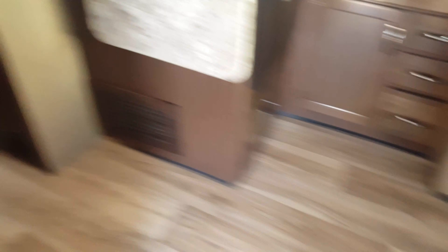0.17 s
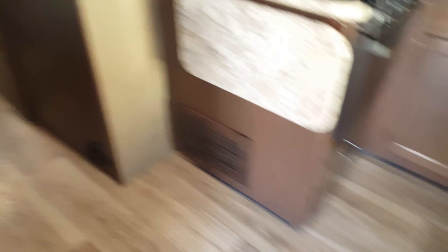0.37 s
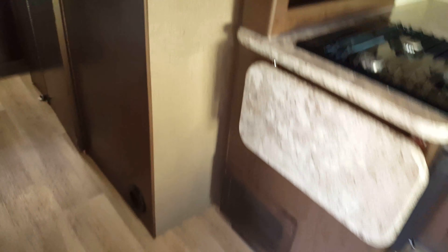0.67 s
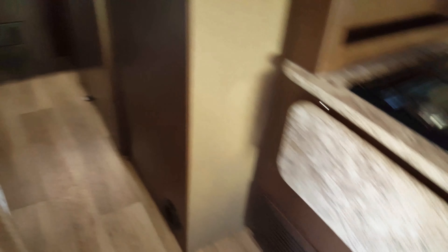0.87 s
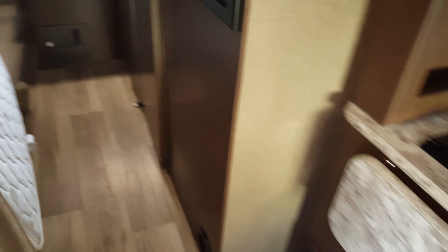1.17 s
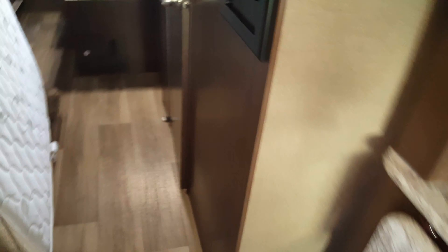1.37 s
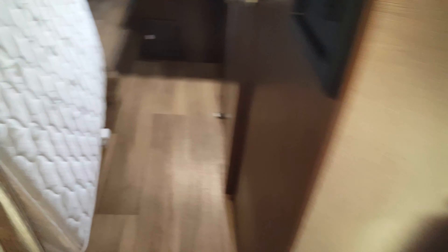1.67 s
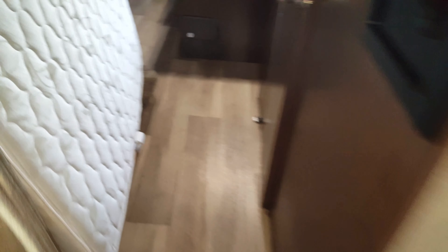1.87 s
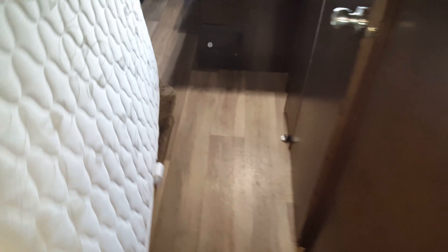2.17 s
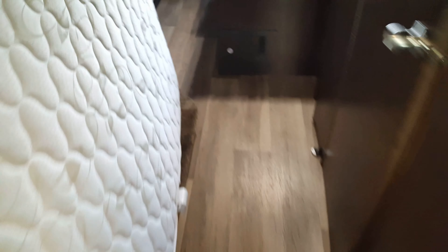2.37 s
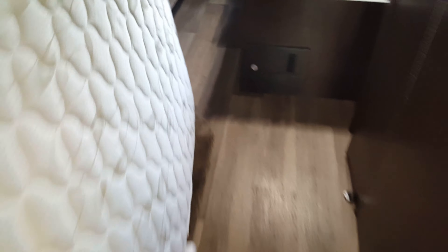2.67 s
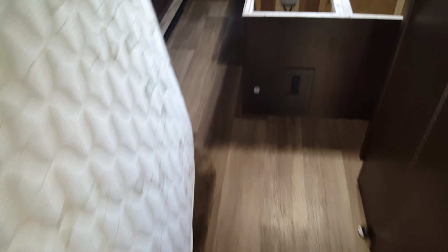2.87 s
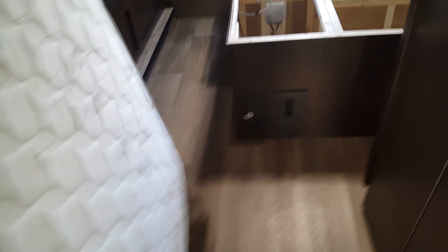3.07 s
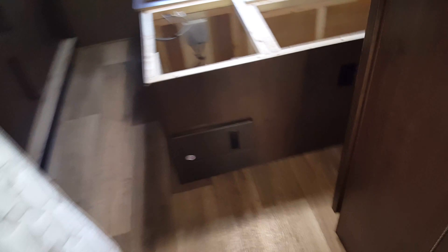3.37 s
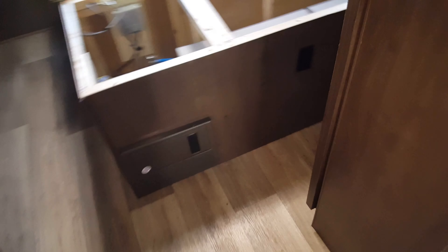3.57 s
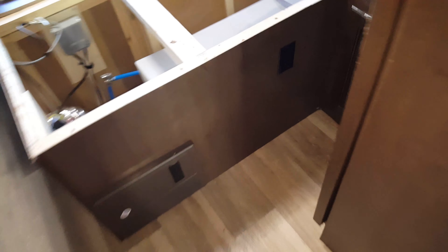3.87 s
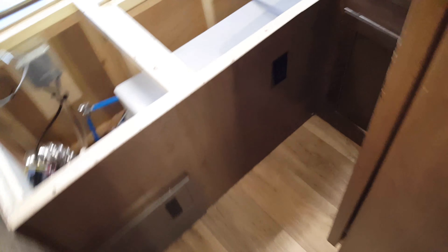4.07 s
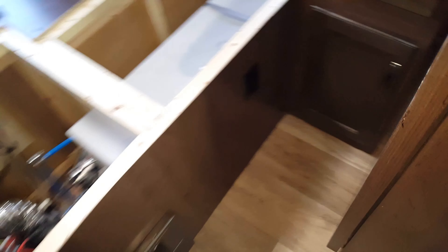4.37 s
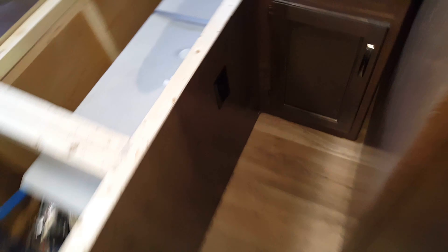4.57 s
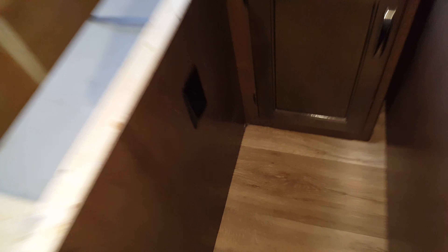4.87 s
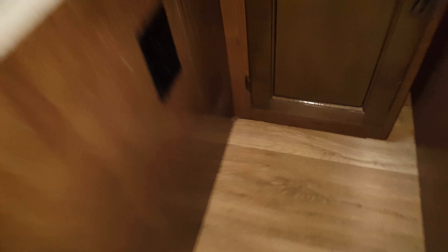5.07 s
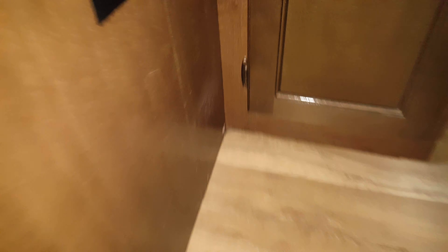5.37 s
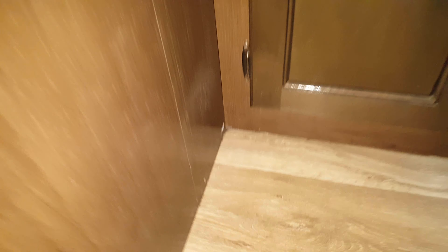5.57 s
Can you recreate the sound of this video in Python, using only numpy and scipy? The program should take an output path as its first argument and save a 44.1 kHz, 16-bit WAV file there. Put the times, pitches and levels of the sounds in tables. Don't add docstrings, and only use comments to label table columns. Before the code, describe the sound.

Someone walks through a small vehicle interior with faintly chiming keys; two heavy footfalls, a bright metallic clatter against a panel, then quieter thuds and rustling.

```python
import sys
import numpy as np
from scipy import signal
from scipy.fft import rfft, irfft
from scipy.io import wavfile
from scipy.ndimage import uniform_filter1d, minimum_filter1d

SR = 44100
rng = np.random.default_rng(int(sys.argv[2]) if len(sys.argv) > 2 else 0)


def unload_wav(signal):
    wavfile.write(
        sys.argv[1],
        SR,
        np.round(np.clip(np.atleast_2d(signal).T, -1, 1) * 32767).astype(np.int16),
    )


def attenuation_scalar(level_db):
    decades = np.asarray(level_db, float) / 20
    return 10 ** decades


N = 252252

# (time [s], peak level [dB], main pitch [Hz], upper pitch [Hz], upper level [dB])
FLOOR_BLOWS = [(0.056, -43, 125, 463, -4), (0.231, -32, 102, 380, 5.5), (0.401, -39.5, 167, 248, -24),
               (0.82, -17.5, 155, 330, -4), (1.402, -35.5, 95.4, 606, -11.5), (1.495, -27.5, 104, 260, 0.5),
               (2.135, -24.5, 99.2, 244, 0), (2.219, -31.5, 87.9, 364, -1.5), (2.776, -38, 260, 470, -2),
               (2.869, -25, 114.3, 451, -2), (2.96, -45.5, 150, 258, -3), (4.443, -43.5, 179, 261, -10),
               (3.458, -13.5, 153.5, 234.5, 0), (3.548, -43, 108, 269, -16), (4.059, -29, 144, 265, 0.5),
               (4.135, -21.5, 104.8, 440, -16), (4.323, -41.5, 208, 278, -5), (4.59, -44.5, 92.4, 250, -17),
               (4.983, -19, 143, 244.6, -9), (5.138, -29.5, 144.9, 421, -9.5),
               (5.311, -42.5, 398.4, 401, -3)]
# (time [s], peak level [dB], main pitch [Hz], t60 [s], upper level
# [dB])
FURTHER_BLOWS = [
    (.173, -4, 159.7, 0.044, 2.5),
    (.185, -6.5, 92, 0.13, -6),
    (.748, -2, 229.8, 0.086, -8),
    (0.778, -10, 178, 0.06, -2),
    (1.936, -30, 100, 0.084, -2),
    (2.776, -36.5, 90.5, .12, -9),
    (4.738, -41.5, 106, 0.2, -6.5),
]
FIRM_T60_S, T60_S_PER_DB = .04, .0018
FURTHER_UPPER_RATIO = 1.75


def blows():
    floor = [(s, db, hz, FIRM_T60_S - T60_S_PER_DB * db, upper_hz, upper_db)
             for s, db, hz, upper_hz, upper_db in FLOOR_BLOWS]
    further = [(s, db, hz, t60, FURTHER_UPPER_RATIO * hz, upper_db)
             for s, db, hz, t60, upper_db in FURTHER_BLOWS]
    return floor + further


def steps():
    out, t = np.zeros((2, N)), np.arange(SR // 3) / SR
    rows = blows()
    noise = rng.standard_normal((len(rows), 2, len(t)))
    for (left, other), (s, db, hz, t60, upper_hz, upper_db) in zip(noise, rows):
        boards = evened(band(np.array([left, left + .3 * other]), 70, 1.3 * min(hz, 200)))
        knock = band(np.array([left, left + 0.27 * other]), 1.2 * upper_hz, 2.16 * upper_hz)
        knock = evened(band(knock, 100, 1.76 * upper_hz))
        fade = attenuation_scalar(-60 * (t / t60) ** (1 + 0.61 * attenuation_scalar(db)))
        swing = fade * np.sin(2 * np.pi * hz * t)
        rumble = boards * attenuation_scalar(-60 * t / (2.8 * t60)) * (1 - np.exp(-t / 0.0045))
        low = swing + attenuation_scalar(-11.5) * rumble
        high = ring(upper_hz, 0.55 * t60, t) + attenuation_scalar(-15) * knock * attenuation_scalar(-60 * t / (2.1 * t60))
        onset = 1 - np.exp(-t / 0.0015)
        add(out, s + .002, -attenuation_scalar(db - 1.5) * onset * (low + attenuation_scalar(upper_db) * high))
    return band(band(out, 60, 6000), 60, 9000)


# (time [s], peak level [dB], ring [Hz], brightness [dB], t60 [s])
LEFT_TICKS = [(0.056, -25, 1950, -6.5, 0.017), (0.108, -30.5, 2050, -21, 0.039),
              (0.175, -12.5, 3900, -13, 0.051), (0.23, -27, 1780, -7, 0.11),
              (0.261, -26, 1140, -0.5, 0.054), (0.352, -40.5, 1540, -2.5, 0.043),
              (0.401, -29.5, 5300, -5.5, 0.03), (0.711, -44, 1800, -10, 0.13),
              (0.892, -36.5, 1000, -14.5, 0.06), (1.079, -46, 2200, -7, 0.12),
              (1.409, -45, 1070, -22, 0.078), (1.499, -29, 2700, -37, 0.09), (1.603, -58, 7530, 7.5, 0.043),
              (2.611, -41, 700, -13.5, 0.068), (2.779, -37.5, 1020, -28, 0.058),
              (2.871, -37, 1290, -20, 0.077), (2.96, -54, 1060, -6.5, 0.049),
              (3.182, -53, 7980, 0.5, 0.056), (3.459, -33, 1597, -20, 0.06), (4.133, -40, 1960, -11, 0.087),
              (4.326, -35, 2550, -8.5, 0.14)]
RIGHT_TICKS = [(0.124, -42, 1200, 4, 0.052), (0.487, -39, 4500, -0.5, 0.1), (0.749, -19, 1100, -14, 0.28),
               (2.794, -43, 2200, -18, 0.13), (3.368, -45, 2800, -6.5, 0.059),
               (3.86, -44, 1109, 3.5, 0.024), (3.999, -54, 1570, -27.5, 0.064),
               (4.061, -30, 2520, -23, 0.037), (4.09, -42, 2040, -16, 0.056),
               (4.182, -49, 2120, -22.5, 0.064), (4.211, -47.5, 1260, -22, 0.048),
               (4.983, -39, 2625, -21, 0.083), (5.036, -47, 4080, -7, 0.051),
               (5.137, -45.5, 1300, -16.5, 0.047)]
SCUFFS = [
    (1.074, -49.5, 2270, 5.5, 0.12),
    (1.454, -60.5, 1150, -15, 0.07),
    (1.791, -43, 3420, -12, 0.1),
    (1.811, -48.5, 2240, 10, 0.3),
    (2.344, -47.5, 7680, 1, 0.13),
    (3.411, -45.5, 2510, -18, 0.084),
    (4.432, -39, 1300, -27, 0.099),
    (4.452, -40, 2500, -21.5, 0.1),
    (5.677, -45, 1240, -18, 0.12),
]
KNOCKS = [
    (1.853, -12.5, 7120, 5.5, 0.15),
    (2.09, -24.5, 2560, -5, 0.08),
    (2.175, -30, 3120, -5, 0.06),
    (2.348, -44, 4600, 3, 0.06),
]
# (frequency [Hz], level [dB])
GRIT_COLOUR = [(150, -17), (600, 0), (2000, 2.5), (5000, -4.5), (8500, -4), (9800, -19), (13000, -16),
               (16000, -18.5)]


def ticks(table, rise, pan_db):
    out, t = np.zeros((2, N)), np.arange(8192) / SR
    noise = evened(colour(rng.standard_normal((len(table), 3, len(t))), GRIT_COLOUR))
    for grit, top, (s, db, hz, bright_db, t60) in zip(noise, above(noise, 5600), table):
        ringing = band(grit, hz / 1.25, hz * 1.2) * attenuation_scalar(bright_db * (hz > 4500))
        body = grit - top + 0.78 * ringing
        shared, *own = body + attenuation_scalar(bright_db + 5) * top
        crack = shared * attenuation_scalar(-60 * t / (.014 + 4 * rise))
        tail = .45 * np.array(own) * attenuation_scalar(-60 * t / max(t60, .005))
        add(out, s, attenuation_scalar(db) * (crack + tail) * (1 - np.exp(-t / rise)), pan_db)
    return out


# (time [s], first key [dB], second key [dB], third key [dB], small keys [dB])
STRIKES = [(0.0014, -45, -46, -49, -50), (0.4005, -61, -66, -42, -67), (0.5345, -47, -45.5, -56.5, -76.5),
           (1.0267, -52, -56, -72, -55.5), (1.178, -41, -48, -58, -50), (1.2221, -44.5, -51, -61, -53),
           (1.8525, -18.5, -24, -26, -32), (1.8629, -15.5, -31, -13.5, -32),
           (1.8846, -21.5, -22.5, -24, -27), (1.8994, -22.5, -22, -28, -38),
           (1.915, -19.5, -19.5, -36, -37), (1.938, -10, -14.5, -32, -20), (1.969, -27, -25, -29.5, -19),
           (1.9994, -32.5, -31, -26, -25), (2.0354, -28, -31.5, -34, -27.5),
           (2.0614, -36, -20.5, -49.5, -47), (2.0776, -31, -21, -37, -35)]
# (frequency [Hz], level [dB], t60 [s])
KEYS = [
    [(7125, -2, .09), (7267, -1, .07), (7378, -3, .12)],
    [(7768, -2, .14), (8030, -9, .1), (8220, -10, .08)],
    [(5011, -4, .07), (5190, 0, .05), (6260, -6, .04), (2494, -6, .07)],
    [(11008, -6, .12), (11230, -6, .06), (13188, -4, .16), (13220, -6, .1)],
]
KEYS_PAN_DB = 4


def keys():
    out, t = np.zeros((2, N)), np.arange(SR // 3) / SR
    chance = rng.random((len(STRIKES), 2, 16))
    onset = 1 - np.exp(-t / 0.0003)
    for (turn, spot), (s, *levels_db) in zip(chance, STRIKES):
        for k, (strike_db, key) in enumerate(zip(levels_db, KEYS)):
            chime = np.zeros(len(t))
            for m, (hz, db, t60) in enumerate(key, start=4 * k):
                chime += attenuation_scalar(db + 5.4 * (spot[m] - .5)) * ring(hz, t60, t, turn[m])
            add(out, s, attenuation_scalar(strike_db - 1) * chime * onset, KEYS_PAN_DB)
    hand_closes_s = 2.098
    return out * attenuation_scalar(-900 * np.maximum(np.arange(N) / SR - hand_closes_s, 0))


# (frequency [Hz], level [dB])
DRAG_COLOUR = [(59, -40), (100, -19), (295, -12.5), (471, 3), (662, -6), (752, 0.5), (1010, 1), (2520, 0.5),
               (5900, -8.5), (7290, -9.5), (9820, -15.5), (13200, -17), (16000, -28)]


def clatter():
    out, t = np.zeros((2, SR)), np.arange(1024) / SR
    for hz, cycles in zip(np.geomspace(560, 8500, num=30), rng.uniform(10, 40, size=30)):
        sizes = attenuation_scalar(6.0 * np.minimum(rng.exponential(1, SR), 3))
        knocks = sizes * (rng.random(SR) < 45 / SR)
        tone = ring(hz, cycles / hz + .004, t) * attenuation_scalar(read(DRAG_COLOUR, hz)) * hz ** .7
        part = signal.oaconvolve(knocks, tone)[:SR]
        out += attenuation_scalar(rng.normal(0, 2, (2, 1))) * np.array([part, np.roll(part, -16)])
    return evened(out)


# (time [s], pressure [dB], edge contact [dB], which brightens it)
DRAG = [
    (1.85, -10, 2.5),
    (1.87, -18.5, 6),
    (1.93, -20.5, 4.5),
    (1.955, -13, -1.5),
    (2.0, -22, 2),
    (2.08, -26.5, -6),
    (2.1, -31, 5),
    (2.22, -37, -3.5),
    (2.27, -56, -16),
]
# (frequency [Hz], width [Hz], level [dB])
PANEL = [(565, 410, -29), (814, 120, -4), (1250, 20, -2), (1540, 49, 8.5), (2000, 96, -1), (2554, 13, -7.5),
         (3715, 77, -2.5)]
# (frequency [Hz], level [dB], t60 [s])
HUMS = [(854, -33, 0.49), (1780, -30, 0.5), (481, -33.5, 0.17)]
SIZZLE_DB, SIZZLE_FOLLOW = 2, 0.71


def drag():
    out, start = np.zeros((2, N)), round(DRAG[0][0] * SR)
    span = slice(start, start + SR)
    level_db, edge_db = curve(DRAG, axis=1)[span], curve(DRAG, axis=2)[span]
    sizes = attenuation_scalar(3. * np.minimum(rng.exponential(1, (3, SR)), 4)) * rng.choice([-1., 1.], (3, SR))
    clumps = attenuation_scalar(2.4 * evened(uniform_filter1d(rng.standard_normal(SR), size=200)))
    shared, *own = sizes * clumps * (rng.random((3, SR)) < 3500 / SR)
    hits = np.array([shared, np.roll(shared, -16)]) + 1.2 * np.array(own)
    t = np.arange(8192) / SR
    panel = sum(attenuation_scalar(db) * np.sqrt(width) * ring(hz, 6.1 / width, t) for hz, width, db in PANEL)
    bunch = sum(attenuation_scalar(db) * ring(hz, t60, t) for key in KEYS for hz, db, t60 in key)
    panel_rings = evened(signal.oaconvolve(hits, panel[None], axes=1)[:, :SR])
    keys_ring = evened(signal.oaconvolve(hits, bunch[None], axes=1)[:, :SR])
    raw = evened(colour(hits, DRAG_COLOUR)) + 0.11 * panel_rings + 0.68 * clatter()
    raw += 0.04 * keys_ring * np.clip((level_db + 34) / 8, 0, 1)
    bright, sizzle = above(raw, 4000), above(raw, 11000)
    mix = raw - bright + attenuation_scalar(edge_db) * (bright - sizzle)
    mix += attenuation_scalar(SIZZLE_DB + SIZZLE_FOLLOW * edge_db) * sizzle
    now = np.arange(SR) / SR
    on = np.clip(now / 0.002, 0, 1) * (now < DRAG[-1][0] - DRAG[0][0])
    mix *= attenuation_scalar(level_db + np.array([[1.2], [-1.2]])) * on
    hum = sum(attenuation_scalar(db - 28) * ring(hz, t60, now[:SR // 2]) for hz, db, t60 in HUMS)
    humming = signal.oaconvolve(mix, hum[None], axes=1)[:, :SR]
    out[:, span] = band(mix + humming, 230, 18000)
    return out


# (middle [s], level [dB], half length [s])
BRUSHES = [
    (.3, -48, 0.133),
    (.65, -63.5, 0.091),
    (1.05, -58, 0.28),
    (1.49, -56, .1),
    (2.3, -57, .12),
    (2.85, -57.5, 0.1),
    (3.12, -66.5, 0.13),
    (3.5, -57.5, .13),
    (4.15, -57.5, 0.14),
    (4.46, -56, 0.092),
]
SWISHES = [
    (0, -50.5, .11),
    (1.84, -60, .15),
    (2.74, -69.5, 0.15),
    (3.9, -68.5, .08),
    (4.74, -55, .15),
    (5.2, -66, .3),
    (5.58, -60.5, .16),
]
# (frequency [Hz], level [dB])
RUSTLE_COLOUR = [(120, -33.5), (200, -5.5), (482, -8.5), (529, -12), (735, -9), (1040, -9), (2860, -15),
                 (7410, -11.5), (10500, -23.5), (15100, -21), (16000, -37)]
BRUSH_TOP_DB, SWISH_TOP_DB, STILL_DB = -12, -5.5, -76


def rustle():
    fibres = air(RUSTLE_COLOUR, patchy_db=1.2, flicker_db=1.2)
    top = above(fibres, 4000)
    body = above(fibres, 170) - top
    soles = swells(BRUSHES, fall_db=15) + attenuation_scalar(STILL_DB)
    cloth = swells(SWISHES, fall_db=13)
    treble = attenuation_scalar(BRUSH_TOP_DB) * soles + attenuation_scalar(SWISH_TOP_DB) * cloth
    return (soles + cloth) * evened(body) + treble * evened(top)


# (time [s], level [dB])
SWAY = [
    (.19, -54),
    (.77, -34),
]
SWAY_FADE_DB_PER_S, SWAY_REST_DB = 60, -86
BOOM_DB, BOOM_FOLLOW, BOOM_FADE_DB_PER_S, BOOM_REST_DB = -41.5, .72, 29, -69


def flex():
    boom, sway = rng.standard_normal((2, N))
    boom = evened(band(band(boom, 60, 190), 55, 230))
    sway = evened(band(band(sway, 22, 55), 20, 60))
    shaken = [(s, BOOM_DB + BOOM_FOLLOW * db) for s, db, *_ in blows()]
    boom = boom * aftermath(shaken, BOOM_FADE_DB_PER_S, BOOM_REST_DB, rise=0.048)
    return boom + sway * aftermath(SWAY, SWAY_FADE_DB_PER_S, SWAY_REST_DB, rise=.015)


# (frequency [Hz], t60 [s])
CABIN = [(60, 0.15), (150, 0.35), (400, 0.54), (1500, .28), (5000, .25), (15000, 0.056)]


def cabin(x):
    taps = np.zeros((3, 2, SR // 2))
    jitter = rng.integers(0, 10, (3, 2, (SR // 2 - 121) // 10))
    at = np.arange(120, SR // 2 - 10, 10) + jitter
    np.put_along_axis(taps, at, rng.choice([-1., 1.], at.shape), 2)
    hz, t, z = signal.stft(taps, SR, nperseg=256)
    tail = signal.istft(z * attenuation_scalar(-60 * t / read(CABIN, hz)[:, None]), SR, nperseg=256)[1]
    tail[:, 1] = tail[:, 0] + above(tail[:, 1] - tail[:, 0], 360)
    turn = 2 * np.pi * (40 * np.arange(N) / SR + np.arange(3)[:, None] / 3)
    fed = x.mean(0) * np.sqrt(2 / 3) * np.cos(turn / 2)
    tail = tail / np.linalg.norm(tail[0, 0])
    return signal.oaconvolve(fed[:, None], tail, axes=2)[..., :N].sum(0)


# (frequency [Hz], level [dB])
HISS_COLOUR = [(15, -29), (25, -7.5), (44, -12), (87, 0), (120, 1), (218, -9), (346, -12.5), (534, -10),
               (1080, -22.5), (2010, -16), (4920, -29), (7800, -26.5), (9950, -36.5), (14900, -28.5),
               (16200, -46.5)]
HISS_DB = -60.5


def hiss():
    return attenuation_scalar(HISS_DB - 2) * air(HISS_COLOUR, patchy_db=-0.06, flicker_db=4.0)


# (frequency [Hz], left-right likeness [0..1])
SAME = [(60, .85), (300, .8), (640, .35), (1400, 0.), (15000, 0.)]


def air(points, patchy_db, flicker_db):
    frames, hz = N // 256 + 5, np.fft.rfftfreq(512, 1 / SR)
    a, b, c, d, patches = rng.standard_normal((frames, 257, 5)).T
    flicker = evened(uniform_filter1d(rng.standard_normal(frames), size=3))
    patches = uniform_filter1d(patches, size=8, axis=0)
    patches = evened(uniform_filter1d(patches, size=10, axis=1))
    same = np.clip(read(SAME, hz), -1, 1)[:, None]
    left, other = a + 1j * b, c + 1j * d
    z = np.array([left, same * left + np.sqrt(1 - same ** 2) * other])
    z *= attenuation_scalar(patchy_db * patches + flicker_db * flicker)
    noise = signal.istft(z, nperseg=512, noverlap=256)[1][:, :N]
    return evened(colour(noise, points))


def swells(rows, fall_db):
    now = np.arange(0, N, 64) / SR
    level = sum(attenuation_scalar(db - fall_db * ((now - s) / half) ** 2) for s, db, half in rows)
    return np.interp(np.arange(N) / SR, now, level)


def aftermath(rows, fade_db, rest_db, rise):
    now = np.arange(0, N, 64) / SR
    power = attenuation_scalar(2 * rest_db)
    for s, db in rows:
        since = np.maximum(now - s, 0)
        power = power + (attenuation_scalar(db - fade_db * since) * (1 - np.exp(-since / rise))) ** 2
    return np.interp(np.arange(N) / SR, now, np.sqrt(power))


def ring(hz, t60, t, turn=0):
    return attenuation_scalar(-60 * t / t60) * np.sin(2 * np.pi * (hz * t + turn))


LAG_PER_DB = 5.5


def add(mix, s, sound, pan_db=0):
    lag = int(np.clip(LAG_PER_DB * pan_db, -19, 19))
    for port, side, row in zip(mix, (1, -1), sound * np.ones((2, 1))):
        start = max(round(s * SR) + side * lag // 2, 0)
        part = port[start:][:len(row)]
        part += attenuation_scalar(side * pan_db / 2) * row[:len(part)]


def read(points, hz):
    f, value = np.transpose(points)
    return np.interp(np.log(hz + 1), np.log(f + 1), value)


def curve(rows, axis):
    rows = np.asarray(rows)
    return np.interp(np.arange(N) / SR, rows[:, 0], rows[:, axis])


def evened(x):
    return x / np.sqrt(np.mean(x ** 2) + 1e-20)


def colour(x, points):
    hz = np.fft.rfftfreq(x.shape[-1], 1 / SR)
    return irfft(rfft(x) * attenuation_scalar(read(points, hz)), x.shape[-1])


def band(x, lo_hz, hi_hz):
    sos = signal.butter(2, [lo_hz, min(hi_hz, SR / 2.1)], "band", fs=SR, output="sos")
    return signal.sosfilt(sos, x)


def above(x, hz):
    f = np.fft.rfftfreq(x.shape[-1], 1 / SR)
    return irfft(rfft(x) / (1 + (hz / (f + 1)) ** 6), x.shape[-1])


# (time [s], left-right level [dB])
FACING = [
    (0, 0.5),
    (.5, 1.7),
    (1.2, 1),
    (2.3, -1),
    (2.6, -1),
    (5.72, -1.5),
]


def scene():
    feet, chimes, scrape = steps(), keys(), drag()
    clicks = ticks(LEFT_TICKS + KNOCKS, rise=0.00024, pan_db=3.0)
    clicks = clicks + ticks(RIGHT_TICKS, rise=.0002, pan_db=-3.5)
    clicks = clicks + ticks(SCUFFS, rise=0.0047, pan_db=0.6)
    wet = attenuation_scalar(-16.5) * feet + attenuation_scalar(-4) * clicks + attenuation_scalar(-3.5) * chimes + attenuation_scalar(-8.5) * scrape
    heard = feet + clicks + chimes + scrape + cabin(wet) + rustle() + flex() + hiss()
    return heard * attenuation_scalar(np.array([[.5], [-.5]]) * curve(FACING, axis=1))


def band_limit(x):
    return signal.sosfilt(signal.butter(12, 16730, fs=SR, output="sos"), x)


def record(dry):
    edge = signal.firwin(127, 15900, fs=SR)
    dry = signal.oaconvolve(dry, edge[None], "same", axes=1)
    room_left = np.minimum(.86 / (abs(dry).max(0) + 1e-9), 1)
    gain = uniform_filter1d(minimum_filter1d(room_left, size=257), size=129)
    return band_limit(dry * gain - 1 / 2000)


dry = scene()
out = record(dry)
unload_wav(out)
```